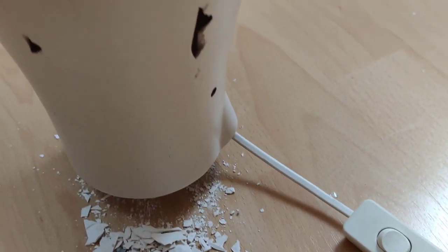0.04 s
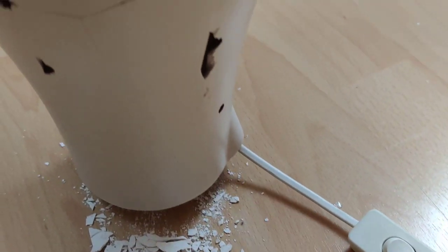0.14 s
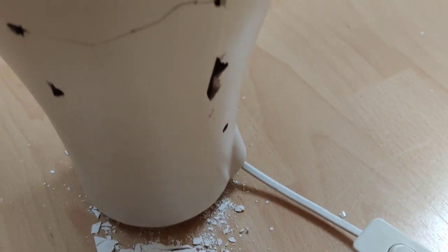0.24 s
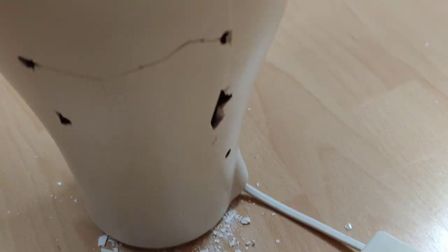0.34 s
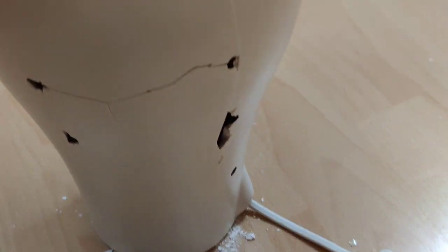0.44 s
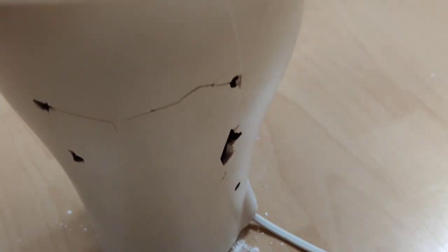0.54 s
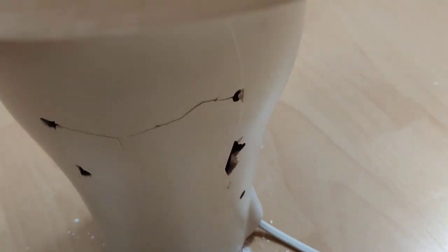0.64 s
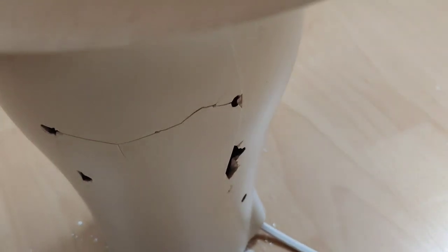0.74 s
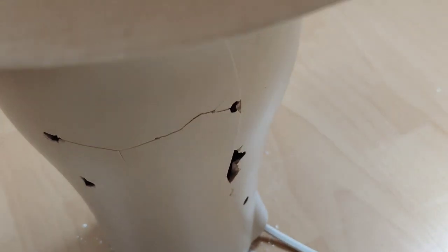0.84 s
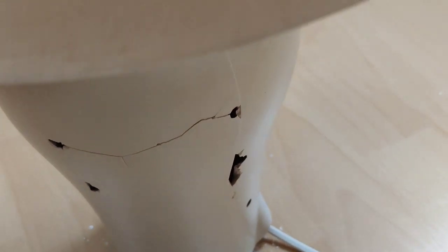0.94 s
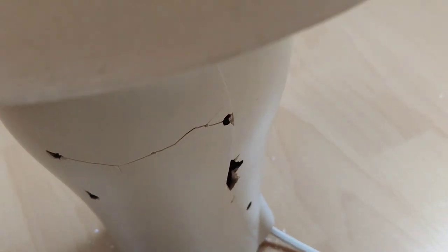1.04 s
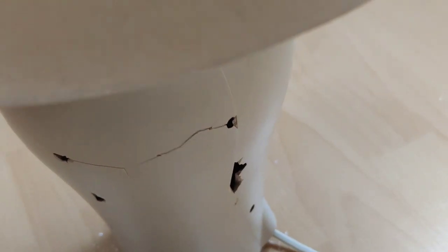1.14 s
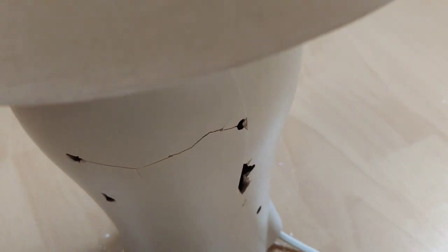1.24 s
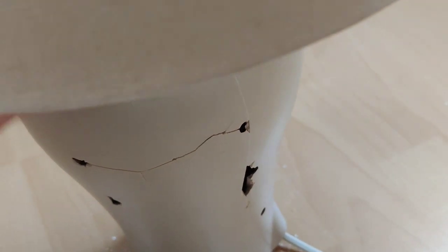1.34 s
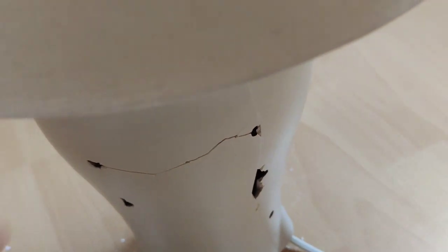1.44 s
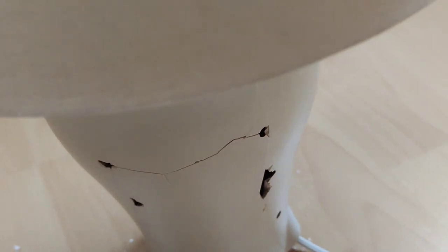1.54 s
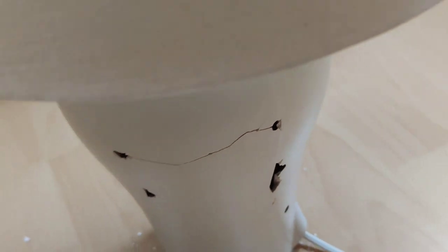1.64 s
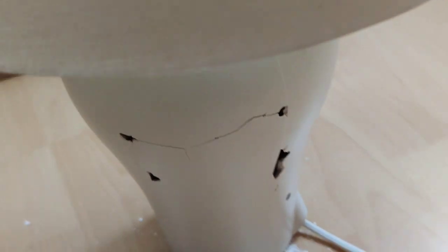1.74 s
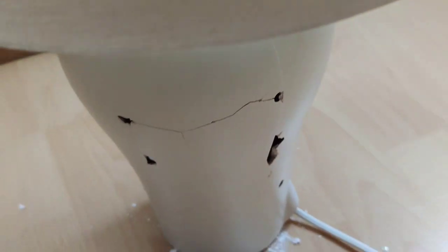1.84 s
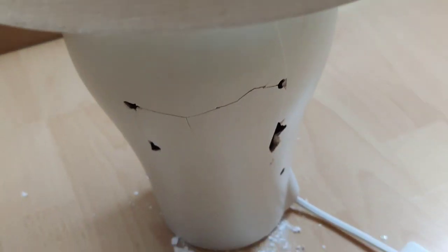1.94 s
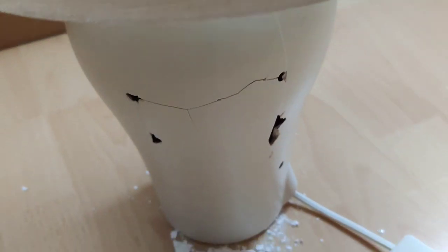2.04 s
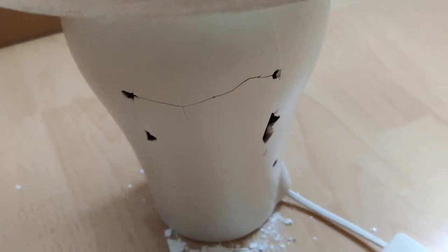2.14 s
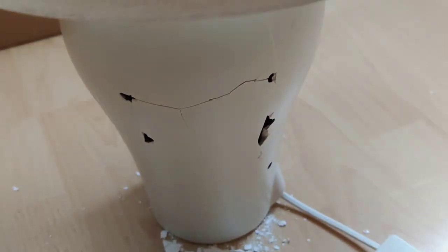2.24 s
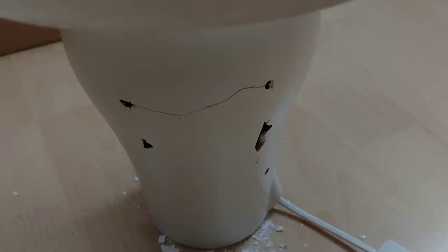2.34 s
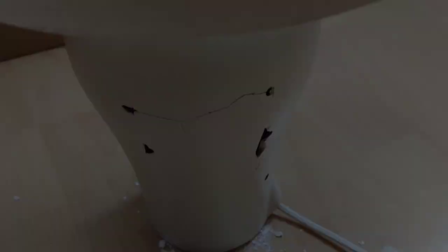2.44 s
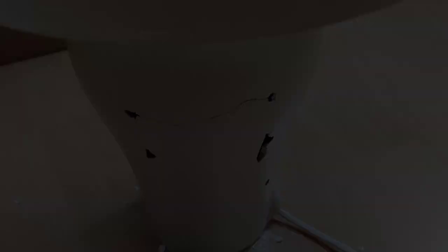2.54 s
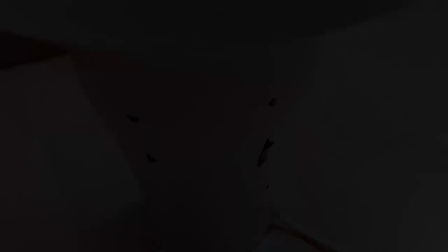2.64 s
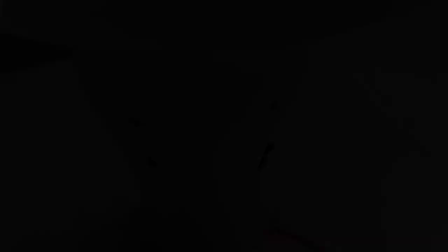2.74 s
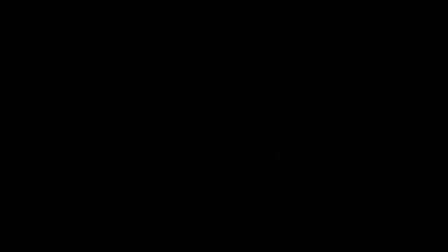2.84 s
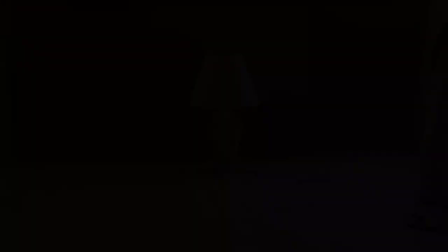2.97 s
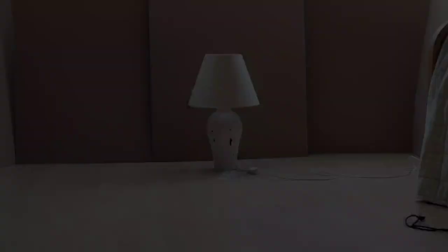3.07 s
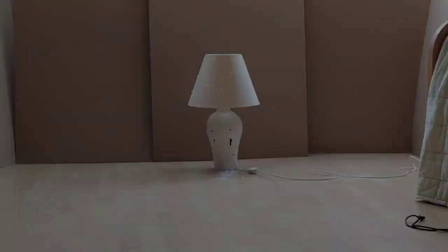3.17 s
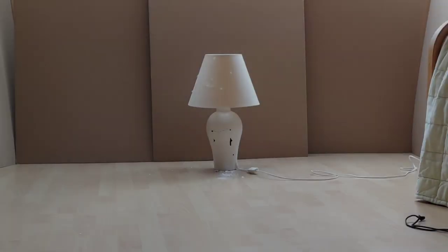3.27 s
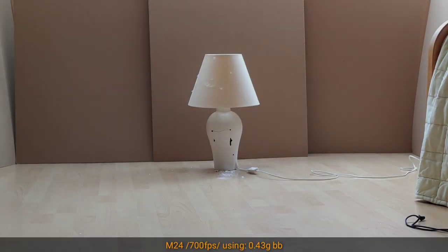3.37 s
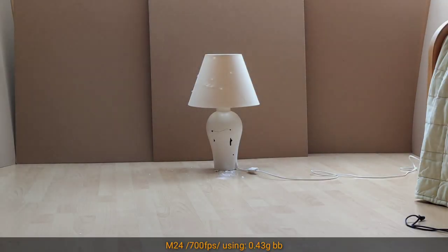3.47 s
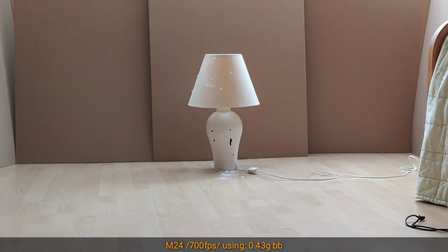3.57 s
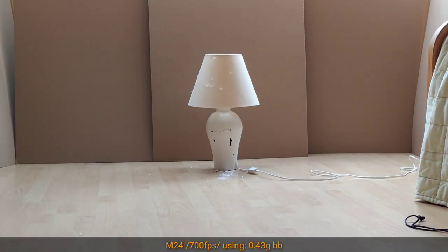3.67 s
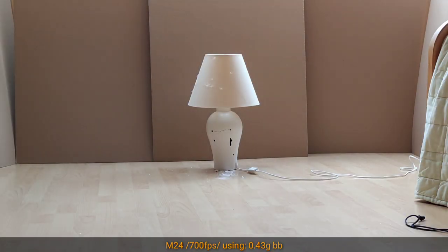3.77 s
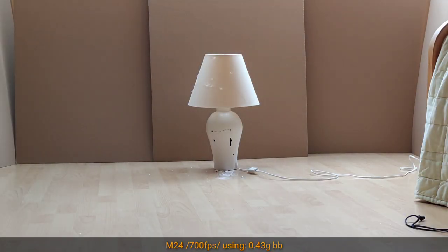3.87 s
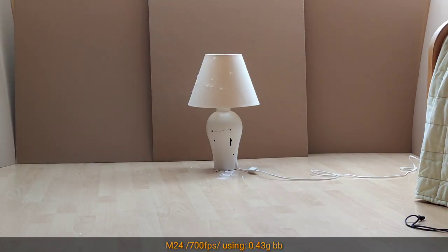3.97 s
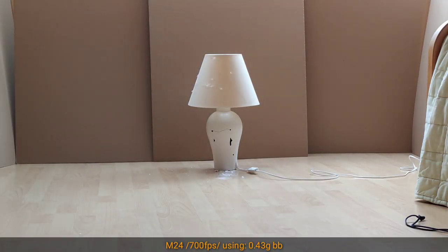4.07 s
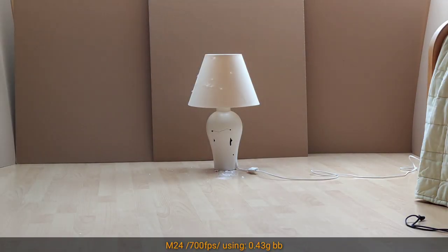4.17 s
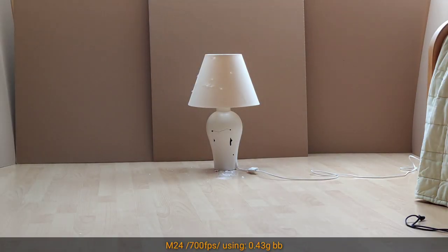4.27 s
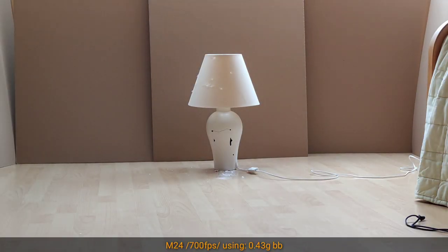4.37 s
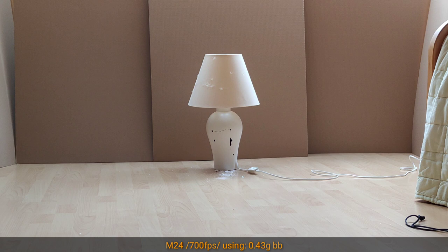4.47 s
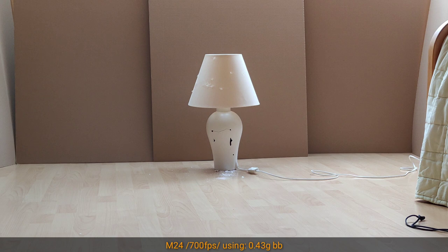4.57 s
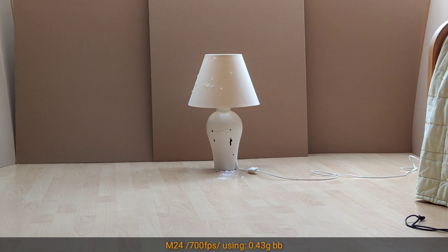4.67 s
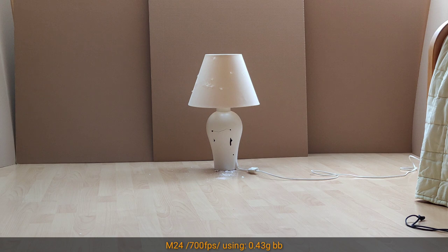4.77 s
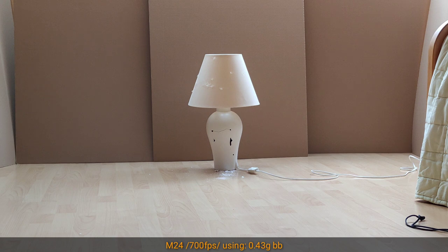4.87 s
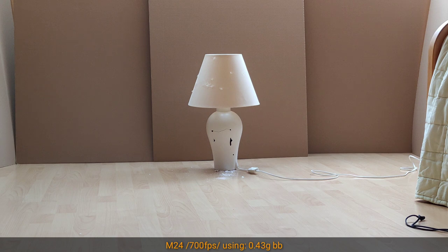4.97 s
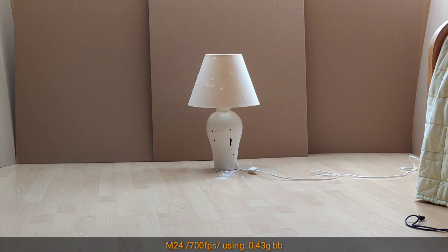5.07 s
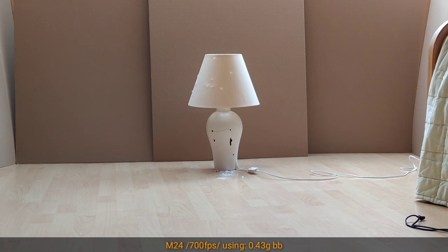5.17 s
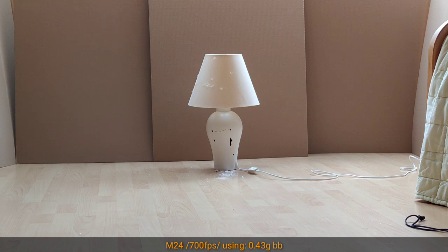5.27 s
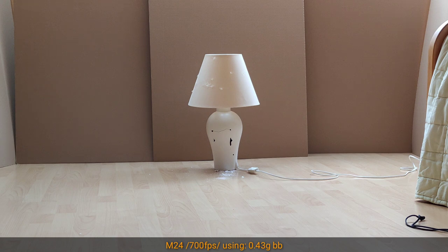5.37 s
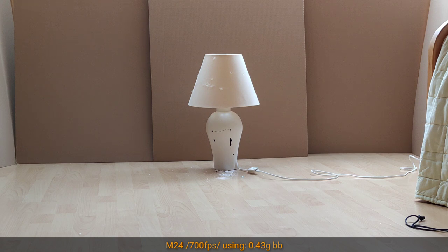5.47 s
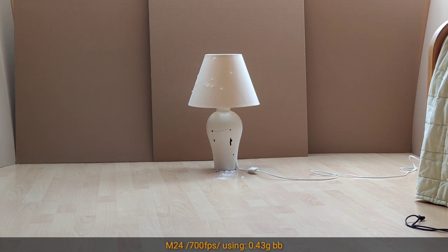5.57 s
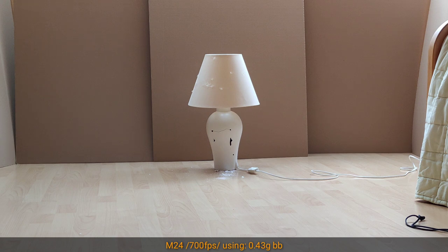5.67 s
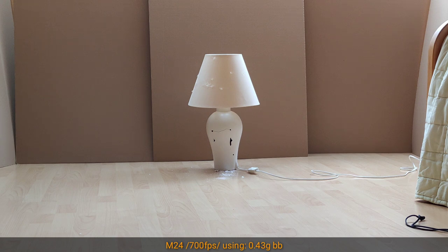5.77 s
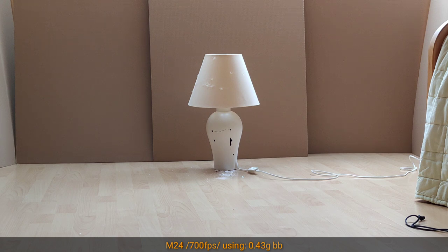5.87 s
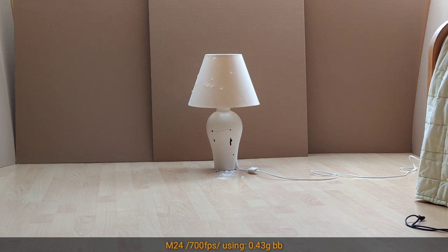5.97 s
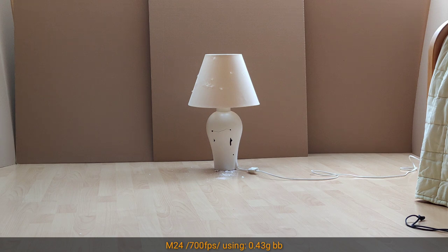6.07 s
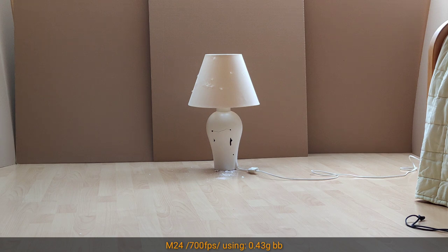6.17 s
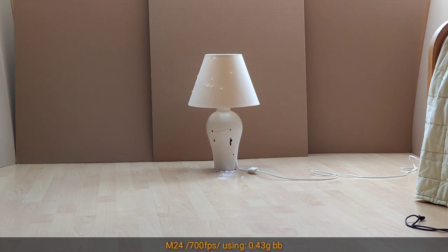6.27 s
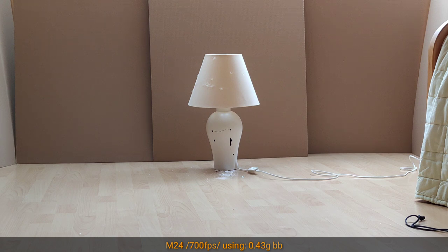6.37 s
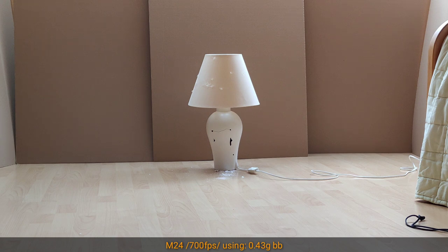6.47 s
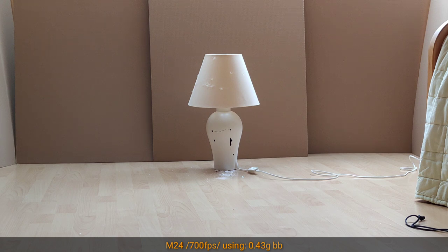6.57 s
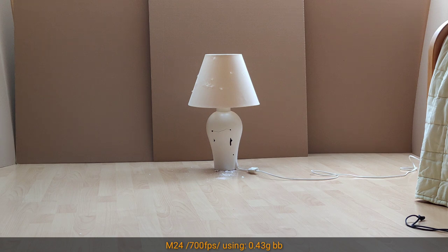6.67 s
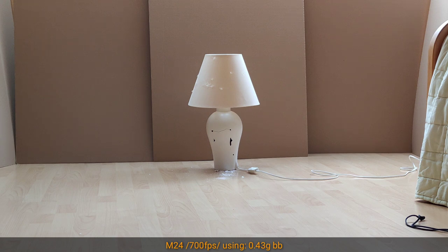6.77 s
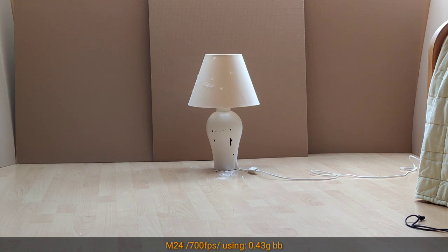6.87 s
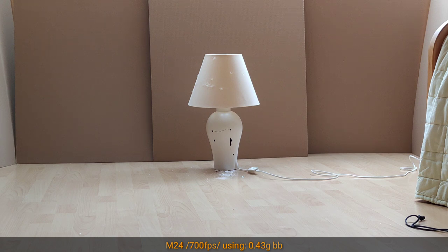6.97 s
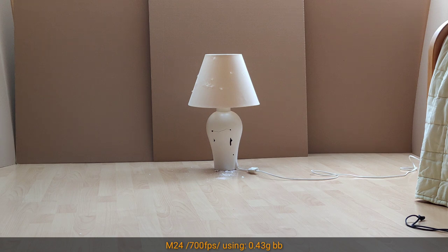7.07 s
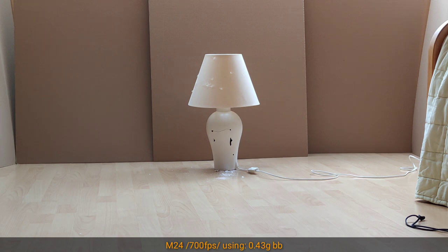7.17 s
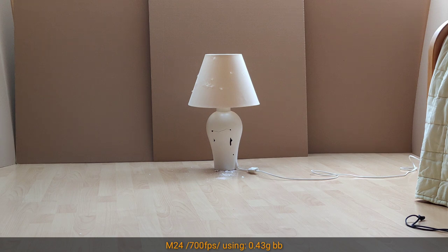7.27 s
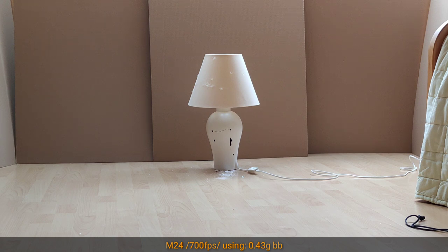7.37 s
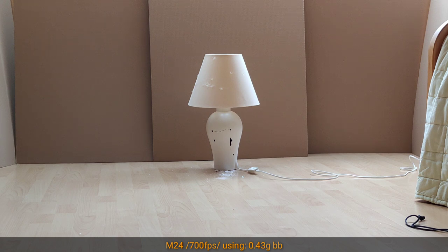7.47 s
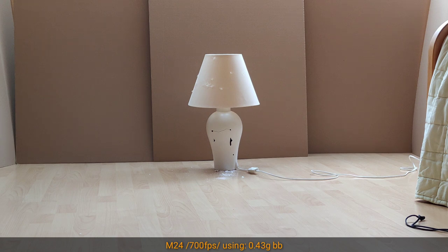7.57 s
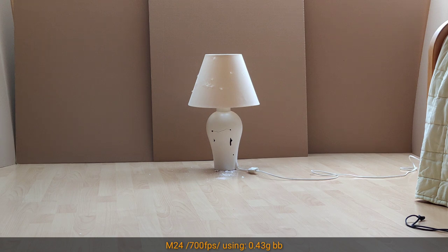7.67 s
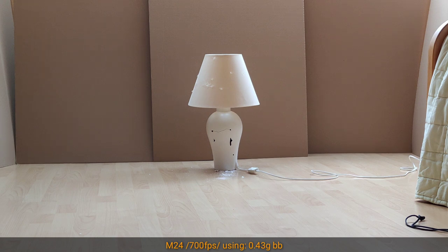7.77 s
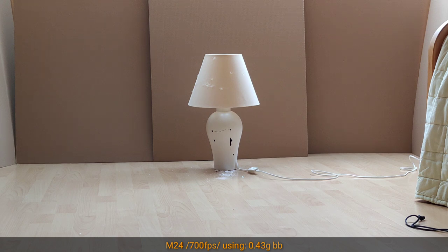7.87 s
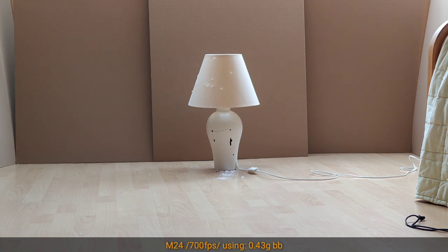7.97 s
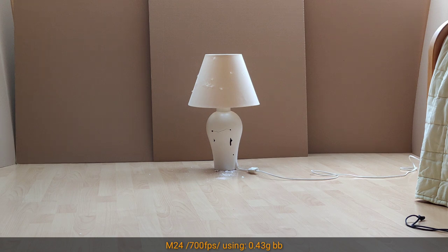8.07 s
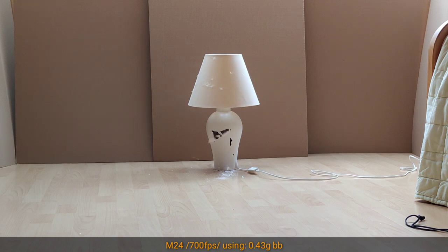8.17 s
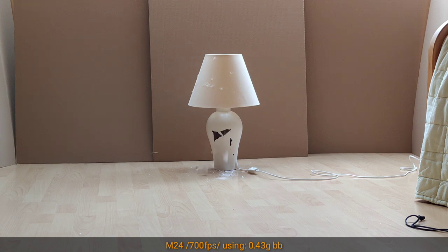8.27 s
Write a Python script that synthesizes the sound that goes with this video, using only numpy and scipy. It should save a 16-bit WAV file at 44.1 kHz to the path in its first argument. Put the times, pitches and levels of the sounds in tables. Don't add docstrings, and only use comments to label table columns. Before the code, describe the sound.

Hard clicks and soft rubbing in a quiet room, a brief silence, metallic rifle cocking, a wait, then a sudden crack as a pellet bursts a lamp.

```python
import sys
import numpy as np
from scipy import signal
from scipy.fft import rfft, irfft, next_fast_len
from scipy.io import wavfile
from scipy.ndimage import map_coordinates

SR = 44100
rng = np.random.default_rng(int(sys.argv[2]) if len(sys.argv) > 2 else 0)


def gain_from_db(level_db):
    decades = np.asarray(level_db, float) / 20
    return 10 ** decades


def file_out(sig):
    cols = np.atleast_2d(sig).T
    lim = np.clip(cols, -1, 1)
    pcm = np.round(lim * 32767).astype(np.int16)
    wavfile.write(sys.argv[1], SR, pcm)


N = 366894
TIME = np.arange(N) / SR
GAP_START, GAP_END = 3.0, 3.032
NEAR_LAG, NEAR_PAN_DB = 2, -1.5
RIFLE_LAG = 18
KNOCK_THUD = (-12.5, 0.1)
BOLT_THUD = (-14, 0.74)
KNOCK_T60, LOCK_T60 = 0.025, 0.02


def unit(x):
    return x / np.sqrt(np.mean(x ** 2) + 1e-20)


def along(points, hz):
    f, v = np.transpose(points)
    return np.interp(np.log(hz + 1), np.log(f + 1), v)


def wobble(rate):
    knots = rng.standard_normal(int(N * rate / SR) + 4)
    return map_coordinates(knots, [np.arange(N) * rate / SR])


def filtered(x, response):
    n = x.shape[-1]
    m = next_fast_len(n + 4096)
    return irfft(rfft(x, m) * response(np.fft.rfftfreq(m, 1 / SR)), m)[..., :n]


def resonant(modes, scatter_db=0):
    db = scatter_db * rng.standard_normal(len(modes))

    def response(f):
        total = 0
        for k, (center, width, gain_db) in enumerate(modes):
            band = 1j * f * width
            total = total + (-1) ** k * gain_from_db(gain_db + db[k]) * band / (center * center - f * f + band)
        return total
    return response


def by_take(near_db, far_db):
    return np.where(TIME > GAP_START, gain_from_db(far_db), gain_from_db(near_db))


# (frequency [Hz], likeness)
AIR_ALIKE = [(60, 1), (180, 0.56), (550, 0.33), (1650, -0.05), (4970, 0.032), (15000, 0.076)]


def air(spectrum, alike=AIR_ALIKE):
    def shape(hz):
        turn = np.arccos(np.clip(along(alike, hz), -1, 1)) / 2
        return gain_from_db(along(spectrum, hz)) * [np.cos(turn), np.sin(turn)]
    mid, side = filtered(rng.standard_normal((2, N)), shape)
    return unit(np.array([mid + side, mid - side]))


# (frequency [Hz], t60 [s])
ROOM_T60 = [(150, 0.57), (700, 0.29), (3000, 0.41), (9000, 0.36), (15000, 0.19)]
# (frequency [Hz], level [dB])
WALL_COLOUR = [(300, -2.7), (2000, -1.1), (6000, -1.5), (11000, 1.5), (15400, 0.5), (16000, -30.5)]


def echo(colour, first_s):
    hz, t, z = signal.stft(rng.standard_normal((2, SR // 3)), SR, nperseg=256)
    decay_db = along(WALL_COLOUR, hz)[:, None] - 60 * t / along(ROOM_T60, hz)[:, None]
    tail = signal.istft(z * gain_from_db(decay_db), SR, nperseg=256)[1]
    rise = 1 - np.exp(-(np.arange(tail.shape[1]) / SR / first_s) ** 2)
    return rise * filtered(tail, colour) / np.linalg.norm(rise * tail[0])


def with_thud(events, thud, t60=None):
    thud_db, share = thud
    return [(s, db, thud_db + share * body, body, edge, *(own or [t60])) for s, db, body, edge, *own in events]


def contacts(events, modes, left_lag, pan_db, wet_db, first_s):
    out = np.zeros((2, N + SR))
    t = np.arange(3072) / SR
    wide = [resonant(sorted((c, w + 0.2 * c, g) for c, w, g in group)) for group in modes]
    sizes = [np.linalg.norm(filtered(1. * (t == 0), ring)) for ring in wide]
    for s, db, thud_db, body_db, edge_db, t60 in events:
        decay = gain_from_db(-60 * t / np.clip(t60, 0.002, 0.1))
        chatter = rng.standard_normal(len(t)) * decay * (1 - np.exp(-t / 0.00012))
        chatter[0] = 0.6 * np.linalg.norm(chatter)
        rings = [filtered(chatter, resonant(group, scatter_db=2.5)) for group in modes]
        gains_db = (thud_db, body_db, 0, edge_db)
        rings = [gain_from_db(db + gain_db) * r / np.abs(r).max() for gain_db, r in zip(gains_db, rings)]
        at = round(s * SR)
        out[0, at + left_lag:][:len(t)] += gain_from_db(pan_db / 2) * sum(rings)
        out[1, at:][:len(t)] += gain_from_db(-pan_db / 2) * sum(rings)
        shares = [np.linalg.norm(r) / size for r, size in zip(rings, sizes)]
        tail = echo(lambda hz: np.sqrt(sum(np.abs(k * ring(hz)) ** 2 for k, ring in zip(shares, wide))), first_s)
        out[:, at:at + tail.shape[1]] += gain_from_db(wet_db) * tail
    return out[:, :N]


def strokes(rows, attack_s, release_db, middle_db, edge_db):
    gains = np.zeros((3, N))
    for s, length, db, bright_db in rows:
        swell = np.clip((TIME - s) / attack_s, 0, 1) ** 2 * (TIME < s + 1)
        level = gain_from_db(db - release_db * np.clip(TIME - s - length, 0, 1))
        gains += swell * level * gain_from_db([[0], [middle_db + bright_db], [edge_db + bright_db]])
    return gains


def rubbing(gains, modes, left_lag, grain_db, pan_db, diffuse):
    out = np.zeros((2, N))
    grain = gain_from_db(grain_db * (wobble(350) + 0.6 * wobble(50) + 0.2 * wobble(14)))
    for gain, group in zip(gains, modes):
        noise = grain * rng.standard_normal((3, N))
        direct, left, right = unit(filtered(noise, resonant(group)))
        pair = np.array([np.roll(direct, left_lag) + diffuse * left, direct + diffuse * right])
        out += gain * unit(pair) * gain_from_db([[pan_db / 2], [-pan_db / 2]])
    return out


# (frequency [Hz], density [dB per Hz])
HISS_NEAR = [(120, -34), (200, -1), (246, -4), (421, -4.5), (474, -5.5), (730, -7.5), (1070, -14),
             (2160, -16.5), (7000, -38), (9100, -66.5), (15400, -120)]
RUMBLE_NEAR = [(13, -43.5), (22, -7.5), (103, 6.5), (122, -6), (177, -9), (246, -19.5), (400, -25.5),
               (520, -47), (880, -120)]
HISS_FAR = [(120, -32), (200, -3), (360, -4.5), (600, -7), (1100, -11.5), (3200, -17.5), (5000, -25.5),
            (7000, -35.5), (9500, -45), (15000, -120)]
RUMBLE_FAR = [(13, -37), (22, 6), (43, -0.5), (81, 0), (139, 0), (184, -3), (205, -8.5), (400, -21.5),
              (520, -43.5), (880, -120)]
# (time [s], level on the rumble [dB])
HAND_SWAY = [(0, 1.5), (.5, -2), (1.2, 5), (1.6, 1), (2.3, -1)]


def background():
    sway = gain_from_db(np.interp(TIME, *np.transpose(HAND_SWAY)))
    near = sway * gain_from_db(-63.5 + wobble(9)) * air(RUMBLE_NEAR) + gain_from_db(-62.5) * air(HISS_NEAR)
    far = gain_from_db(-66.5 + wobble(9)) * air(RUMBLE_FAR) + gain_from_db(-69) * air(HISS_FAR)
    return by_take(0, -140) * near + by_take(-140, 0) * far


# (time [s], shaft speed [Hz], level [dB], load [dB], lifts order 3 over the others)
IDLE = [(0, 35.8, -61.5, -1.5), (1, 36.48, -65.5, -3.5), (1.5, 36.26, -63, -3), (1.75, 35.3, -63.5, 4),
        (2.7, 34.07, -61, 2.5), (3.1, 35.86, -77.5, -1), (4.4, 35.03, -82, -8), (5.5, 34.4, -71, -0.5),
        (6.4, 35.5, -75.5, -1.5), (6.9, 35.1, -88, 2.2), (7.4, 34.81, -76.5, -3), (8.31, 35.57, -74.5, -7)]


def engine():
    s, *columns = np.transpose(IDLE)
    shaft, level_db, load_db = (np.interp(TIME, s, c) for c in columns)
    turn = 2 * np.pi * np.cumsum(shaft + 0.25 * wobble(9.3)) / SR
    near_db, far_db = (0.1, 0.4, -0.9, -6, -6), (-17, -1.8, 1.5, -9.5, -14)
    out = np.zeros((2, N))
    for order, near, far in zip(range(2, 7), near_db, far_db):
        skew = rng.uniform(-0.4, 0.62) * np.array([[1], [-1]])
        gain = by_take(near, far) * gain_from_db(level_db + (load_db if order == 3 else -load_db))
        phase = order * turn + skew + rng.uniform(0, 2 * np.pi)
        out += np.sqrt(2) * gain * gain_from_db(1.5 * wobble(4.8)) * np.sin(phase)
    return out


# (start [s], length [s], level [dB], brightness [dB])
RUSTLE = [(-.1, 0.17, -52.5, -3), (.06, 0.072, -56.5, -3), (.5, .2, -68.5, 2), (.9, .18, -63.5, 4.5),
          (1.08, 0.24, -55, 2.5), (1.22, 0.23, -66, 9)]
# (frequency [Hz], width [Hz], level [dB])
RUSTLE_MODES = [
    [(584, 130, 0.9), (960, 350, 0.9), (1500, 600, -12)],
    [(2208, 900, -4), (2978, 750, 1), (4180, 870, -4.5)],
    [(5600, 4000, -2), (10500, 9000, 0.5)],
]


def rustle():
    gains = strokes(RUSTLE, attack_s=0.1, release_db=251.5, middle_db=-10, edge_db=-20)
    return rubbing(gains, RUSTLE_MODES, left_lag=2, grain_db=1.0, pan_db=-2.4, diffuse=5.5)


# (time [s], peak [dB], body [dB], edge [dB])
THUDS = [
    (.708, -58, 3, -10),
    (0.7138, -45, 11, -16),
    (1.3624, -44, 8, -14),
]
# (frequency [Hz], width [Hz], level [dB])
THUD_MODES = [
    [(120, 40, -1), (260, 80, -3)],
    [(587, 90, .1), (824, 60, -2.5), (1280, 200, -9)],
    [(1650, 150, .1), (1930, 150, -4), (2500, 250, -3), (4100, 900, -12)],
    [(6500, 4000, -3), (11000, 4000, -3)],
]


def case_thuds():
    events = with_thud(THUDS, KNOCK_THUD, KNOCK_T60)
    return contacts(events, THUD_MODES, NEAR_LAG, NEAR_PAN_DB, wet_db=-5.5, first_s=0.004)


KNOCKS = [(.797, -58.5, 3, -13.5), (0.8974, -64.5, -13, 18), (0.9204, -68.5, -12.5, 17.5),
          (0.9924, -61, -3, -1), (1.0196, -55, -1, 9), (1.0435, -47, 4.5, 14), (1.0835, -35.5, 2.3, 1.3),
          (1.142, -35, -6, 1.1), (1.158, -34, -5, 2.7), (1.1161, -44.5, 4, 10), (1.1332, -25, -4, 7.5),
          (1.238, -27.5, 2.5, 4), (1.3546, -42.5, -3, 5), (1.0937, -33, 4.5, 4), (1.1005, -42, 6, -8),
          (1.1088, -43, 7, -8), (1.1545, -35, -2.5, 1.5), (1.1475, -38, -4, 3), (1.168, -40, -4, 4),
          (1.197, -41, -4, 3), (1.245, -36, -3, 3), (1.2305, -48, 3, -3), (1.804, -47.5, -4, -28),
          (1.9051, -46.5, -2, 4), (2.7258, -66, 3.5, 19.5)]
# (time [s], peak [dB], body [dB], edge [dB], chatter t60 [s])
RATTLES = [
    (0.674, -54, 6, 6, 0.12),
    (0.771, -56, -5, -1, 0.09),
    (1.082, -46.5, -7, -2, .072),
    (1.1506, -35, -6, -1.5, 0.12),
    (1.186, -34.5, -6, -3.5, .04),
]
# (frequency [Hz], width [Hz], level [dB])
KNOCK_MODES = [
    [(78, 18, -1), (231, 51, -6.5)],
    [(585, 74, 3), (865, 170, 3.5), (1570, 240, -8.5), (1250, 60, -3), (807, 40, 3)],
    [(2060, 310, -2), (2840, 410, 0), (4070, 520, 0.5), (5100, 250, -2.5), (3050, 50, 1.5)],
    [(5540, 5300, -5.5), (11300, 3000, 6)],
]


def knocks():
    events = with_thud(KNOCKS, KNOCK_THUD, KNOCK_T60) + with_thud(RATTLES, KNOCK_THUD)
    return contacts(events, KNOCK_MODES, NEAR_LAG, NEAR_PAN_DB, wet_db=-5, first_s=0.003)


# (time [s], peak [dB], body [dB], edge [dB], chatter t60 [s])
BLOW = [
    (0.456, -36, 3, 12, 0.05),
    (0.4614, -20, 5, 4.5, .015),
    (0.4672, -23.5, -1.5, -2.5, .02),
    (.474, -28, -3, -2.5, .025),
    (.4865, -36, -2.5, 1.5, .06),
    (.5, -36, -8, 1.5, .1),
    (.52, -38, -6, .1, .1),
]
# (frequency [Hz], width [Hz], level [dB])
BLOW_MODES = [
    [(78, 18, -1), (231, 51, -6.5)],
    [(576, 40, .1), (950, 500, -6), (829, 35, 4), (1460, 45, -1.5), (1600, 300, -12)],
    [(2370, 60, -2.5), (2990, 70, .1), (3630, 60, -4), (3800, 80, -1.5), (4450, 220, -3), (5480, 80, -8),
     (5900, 60, -8)],
    [(6200, 2000, -4), (9200, 3000, 5), (13000, 4000, 1.5)],
]


def heavy_blow():
    events = with_thud(BLOW, KNOCK_THUD)
    return contacts(events, BLOW_MODES, NEAR_LAG, NEAR_PAN_DB, wet_db=-6, first_s=0.004)


# (start [s], length [s], level [dB], brightness [dB])
SLIDE = [(3.14, 0.24, -57.5, -4.5), (3.3, .14, -57, -1.5), (3.36, 0.34, -52, 1.5), (3.6, .24, -54, -1.5),
         (3.72, 0.32, -51.5, -3.5), (4.33, .09, -55, 3), (4.785, .07, -51, 8.5), (4.87, 0.1, -58, 3),
         (4.94, .12, -53.5, 2.5), (5.38, 0.1, -59.5, 3), (5.48, 0.07, -62.5, -17)]
# (frequency [Hz], width [Hz], level [dB])
SLIDE_MODES = [
    [(630, 30, -5), (800, 170, 0.1), (1410, 500, -11)],
    [(1960, 250, -2.5), (2870, 260, .1), (3500, 500, -8), (5000, 320, -11), (5710, 250, -15),
     (6230, 300, -16)],
    [(8300, 3500, 0.1), (12500, 4000, -6)],
]


def bolt_slide():
    gains = strokes(SLIDE, attack_s=0.1749, release_db=226.5, middle_db=-6, edge_db=-22.5)
    return rubbing(gains, SLIDE_MODES, RIFLE_LAG, grain_db=2.1, pan_db=-2.0, diffuse=0.91)


# (time [s], peak [dB], body [dB], edge [dB])
DRAW_CLICKS = [(3.1354, -49.5, 1.2, -13.5), (3.1752, -57, -1, -10), (3.1864, -62.5, 19, -10.5),
               (3.2764, -46, 0, -4), (3.322, -44, 1, -3), (3.3321, -27.5, -27, -2.5),
               (3.3469, -48.5, 17.5, -21), (3.7399, -53, -17, -14), (3.7608, -39, -2.5, -12),
               (3.8477, -50, -1, -14), (3.9025, -41, 4, -12), (3.9231, -33, -12, -12),
               (3.9514, -47, 6, -12), (3.9739, -42, -12, -19), (3.998, -46, -14, -15),
               (4.0089, -31.5, -9, -23), (4.038, -40.5, 8.5, -11), (4.277, -42, -0.5, -26),
               (4.372, -53, 5, 5.5)]
# (time [s], peak [dB], body [dB], edge [dB])
LOCK_CLICKS = [(4.806, -60, 13, -20.5), (4.823, -52, 5, -12), (4.865, -53, -4, 0), (4.971, -55, -12, 4),
               (4.99, -59, 12, 7), (5.04, -60, 14, -30), (5.069, -46, 8, 9), (5.0818, -33, 1.5, 4),
               (5.086, -40, 1.5, 3), (5.217, -52, 3, -3), (5.5164, -66, 20, -12),
               (5.579, -40.5, -10.5, 13.5), (5.591, -44, 6, 3), (8.2141, -55, -21, -20)]
# (time [s], peak [dB], body [dB], edge [dB])
SLAMS = [
    (4.0432, -27, -8, 3.5),
    (4.2873, -36, 4, -10),
    (5.0594, -29, -2.5, -10),
    (5.5948, -25, 4.5, .1),
]
# (frequency [Hz], width [Hz], level [dB])
BOLT_MODES = [
    [(196, 38, -4), (373, 81, 2.5), (503, 130, .1)],
    [(545, 90, 1), (870, 450, 0.5), (1598.5, 620, -7.5), (1660, 9.1, -2.5), (616.2, 24, 9.5)],
    [(1950, 260, -1.5), (2850, 340, 5.5), (4130, 1900, -4), (2890, 50, -1.7), (5000, 450, -7)],
    [(7500, 6300, -0.5), (14500, 7600, -3.5)],
]


def bolt_clicks():
    events = with_thud(DRAW_CLICKS, BOLT_THUD, t60=0.027)
    events += with_thud(LOCK_CLICKS, BOLT_THUD, LOCK_T60)
    events += with_thud(SLAMS, thud=(-11, 0.28), t60=0.026)
    return contacts(events, BOLT_MODES, RIFLE_LAG, pan_db=-6.0, wet_db=-4.5, first_s=0.0059)


# (time [s], peak [dB], body [dB], edge [dB])
SEAR = [
    (5.2218, -25, -3, -7),
    (5.503, -50, -10, -10),
    (5.9085, -56, -24, -27),
]
# (frequency [Hz], width [Hz], level [dB])
SEAR_MODES = [
    [(293, 100, .1)],
    [(610, 20, 16), (950, 410, 12.5), (1670, 15, 12)],
    [(2200, 300, -1.5), (4300, 1500, -9), (2820, 135, 6), (2960, 95, 4.6)],
    [(6300, 8400, 6), (13000, 7100, 4)],
]


def sear_catch():
    events = with_thud(SEAR, BOLT_THUD, LOCK_T60)
    return contacts(events, SEAR_MODES, RIFLE_LAG, pan_db=-2.0, wet_db=-10.5, first_s=0.0085)


# (time [s], peak [dB], body [dB], edge [dB], chatter t60 [s] where it rattles)
HANDLE = [
    (5.3666, -26, 0.14, -11),
    (5.371, -42, 11, -20),
    (5.392, -53, 13, -20, .1),
    (5.415, -53, 13, -20, .1),
    (5.44, -57, 13, -20, .1),
]
# (frequency [Hz], width [Hz], level [dB])
HANDLE_MODES = [
    [(248, 105, .1)],
    [(560, 120, 1.5), (1100, 420, .1), (1650, 320, -1.4)],
    [(3100, 900, 2.8), (4000, 2100, -3)],
    [(6200, 2400, 6), (11700, 6200, -19)],
]


def handle_turn():
    events = with_thud(HANDLE, BOLT_THUD, LOCK_T60)
    return contacts(events, HANDLE_MODES, RIFLE_LAG, pan_db=-6.0, wet_db=-8.5, first_s=0.0079)


def air_push():
    t = np.clip(TIME - 8.2532, 0, 1)
    return -2 * gain_from_db(-14 - 60 * t / 0.028) * np.sin(2 * np.pi * 95 * t)


# (time [s], crackle [dB], thump [dB], t60 [s])
SHOT = [
    (8.2437, -22, -31, .02),
    (8.2451, -13.5, -27, 0.038),
    (8.2525, -13, -14, 3),
    (8.263, -27, -20.5, 0.047),
]
# (frequency [Hz], density [dB per Hz])
BURST_COLOUR = [(350, -34), (600, -10.5), (1380, -6.5), (1560, -4), (2960, -4.5), (3400, -6), (5150, -7.5),
                (6700, -10), (8480, -8.5), (11700, -10.5), (15200, -9), (15800, -17.5), (16500, -33.5)]
THUMP_COLOUR = [(15, -27.5), (25, -7), (54, -2), (128, -5.5), (361, -10), (462, 1.5), (620, -9),
                (1000, -12.5), (1300, -42), (2200, -120)]
# (frequency [Hz], likeness)
BOOM_ALIKE = [(40, 0.98), (130, 0.48), (300, 0.63), (700, 0)]


def shot():
    flutter = gain_from_db(0.4 * wobble(900) + 0.74 * wobble(120))
    crackle = unit(flutter * air(BURST_COLOUR)) * gain_from_db([[0.6], [-0.6]])
    thump = air(THUMP_COLOUR, BOOM_ALIKE)
    out = np.zeros((2, N))
    for s, crackle_db, thump_db, t60 in SHOT:
        t = np.clip(TIME - s, 0, 1)
        rise = 1 - np.exp(-t / 0.0004)
        out += rise * gain_from_db(crackle_db - 60 * t / t60) * crackle
        out += rise * gain_from_db(thump_db - 60 * t / min(t60, 0.052)) * thump
        out += rise * gain_from_db(thump_db - 14.5 - 60 * t / t60) * thump
    return out


def scene():
    room = background() + engine()
    camera = rustle() + case_thuds() + knocks() + heavy_blow()
    rifle = bolt_slide() + bolt_clicks() + sear_catch() + handle_turn()
    return room + camera + rifle + air_push() + shot()


# (frequency [Hz], width [Hz], level [dB])
PORTS = [
    [(8400, 850, 9), (6900, 900, -4)],
    [(6000, 1500, 1.5), (7000, 1200, -5), (8300, 1500, -30)],
]


def microphone_ports(dry):
    left, right = (resonant(port) for port in PORTS)
    return filtered(dry, lambda hz: 1 + np.array([left(hz), right(hz)]))


# (frequency [Hz], density [dB per Hz])
CIRCUIT = [(3000, -30), (6500, -18), (8200, 0), (10500, -1.5), (13000, -2.5), (15500, 3), (16000, -11),
           (16500, -60.5)]


def circuit_hiss():
    return by_take(-76.5, -77.5) * air(CIRCUIT)


def fade():
    fade_out = np.interp(TIME, (2.27, 3.08), (1, 0)) ** 1.45
    fade_in = np.interp(TIME, (2.986, 3.6), (0, 1)) ** 1.75
    return (TIME < GAP_START) * fade_out + (TIME > GAP_END) * fade_in


def low_pass(x):
    return signal.sosfilt(signal.butter(12, 16650, fs=SR, output="sos"), x)


# (frequency [Hz], level [dB])
BAND_LIMIT = [(16000, 0), (16700, -30)]


def record(dry):
    x = microphone_ports(dry) + circuit_hiss()
    x = x / (1 + np.abs(x / 0.7) ** 5) ** (1 / 5)
    mix = fade() * filtered(x, lambda hz: gain_from_db(along(BAND_LIMIT, hz)))
    return low_pass(mix)


dry = scene()
out = record(dry)
file_out(out)
```